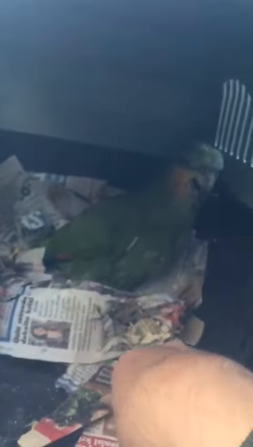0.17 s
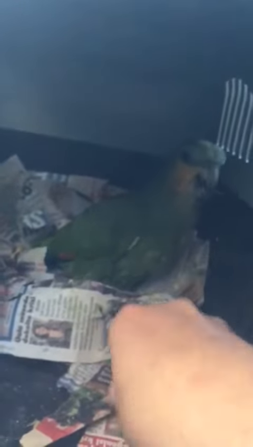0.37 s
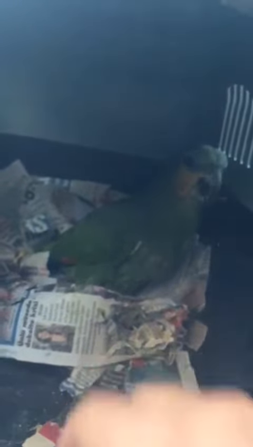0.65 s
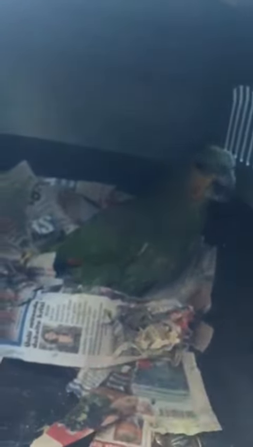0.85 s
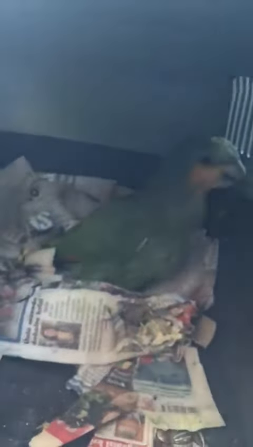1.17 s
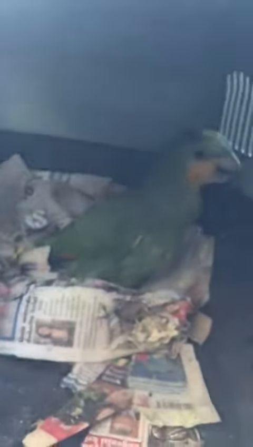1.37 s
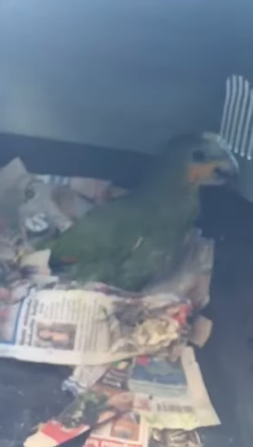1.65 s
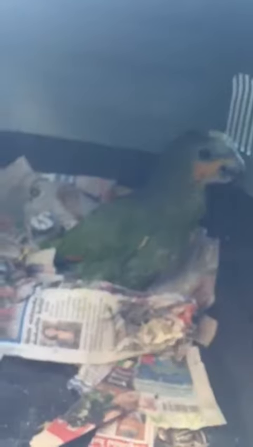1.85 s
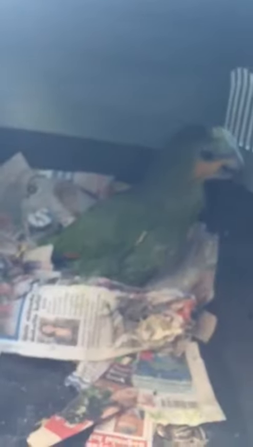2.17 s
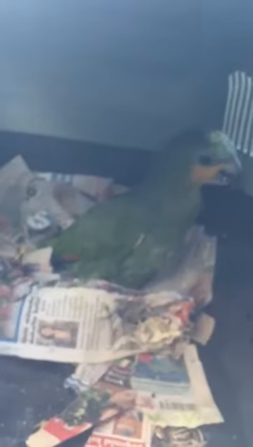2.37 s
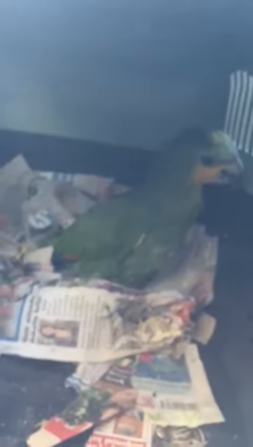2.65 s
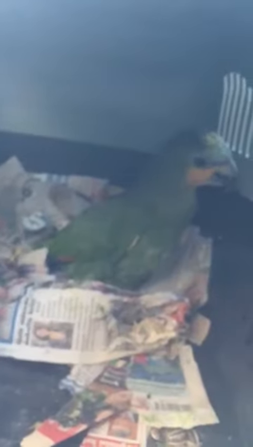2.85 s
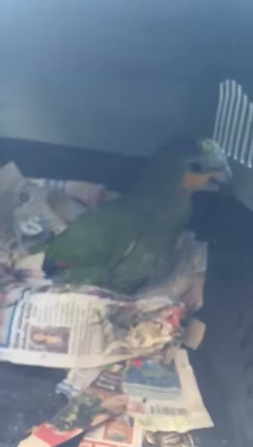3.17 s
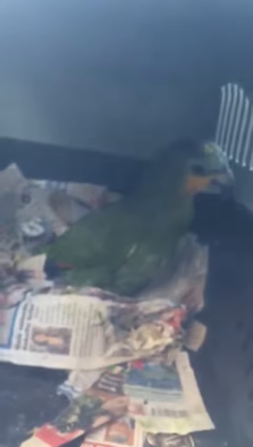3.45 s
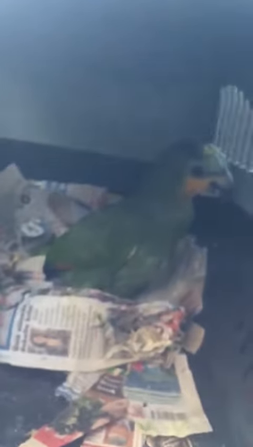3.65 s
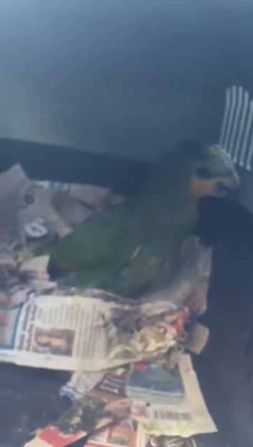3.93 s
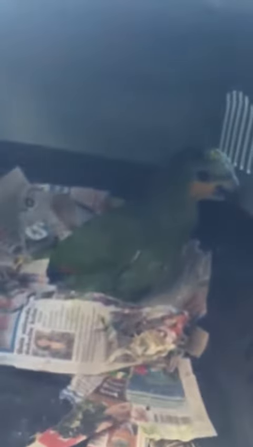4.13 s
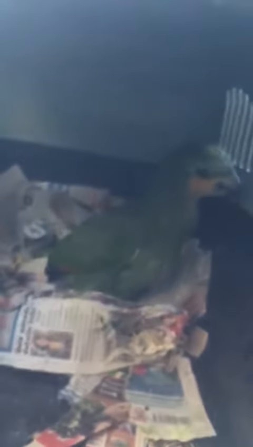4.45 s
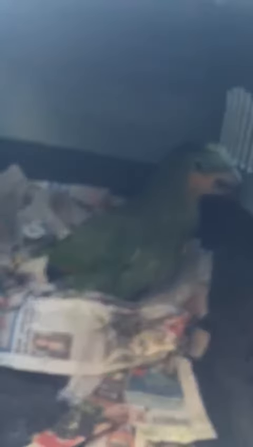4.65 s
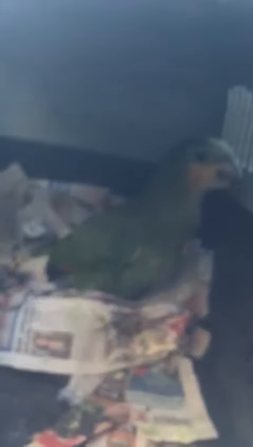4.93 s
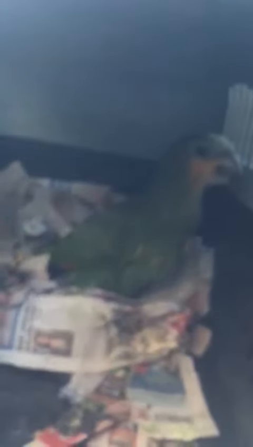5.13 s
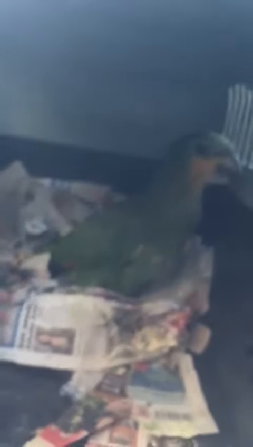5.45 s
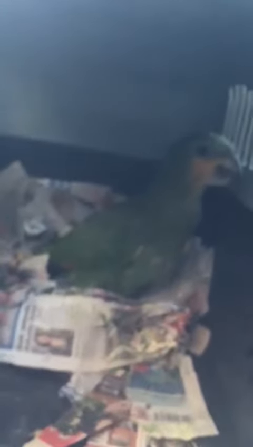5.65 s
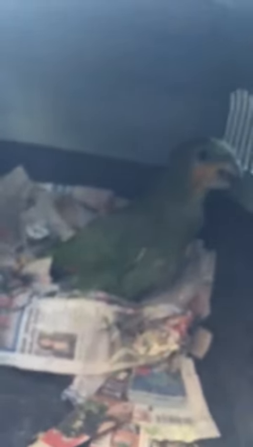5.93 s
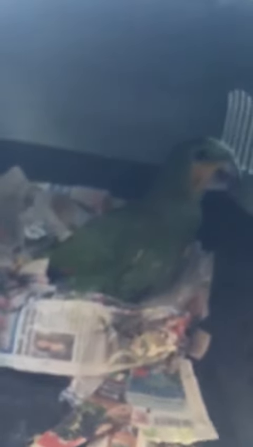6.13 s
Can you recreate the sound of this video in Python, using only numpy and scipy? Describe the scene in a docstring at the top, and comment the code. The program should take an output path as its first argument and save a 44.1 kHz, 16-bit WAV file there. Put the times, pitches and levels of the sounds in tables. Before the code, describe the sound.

A parrot cracks shells close by in a hard carrier, irregular clicks thinning to soft paper rustles above deep, wavering road drone.

```python
"""Inside a car cabin, probably moving slowly, a parrot sits on newspaper and seed shells in a plastic carrier.
Close by, shells snap under beak and feet: sharp impulses that bounce and ring briefly in the small hard box.
Paper scuffs are bursts of uneven slips through the same box; a few snaps and clicks also carry short notes.
Behind them lie shaped noise for road rumble and hiss, gliding sines for a low drone and boom,
and a faint engine hum of four partials that climbs and falls back."""
import sys
import numpy as np
from scipy import signal
from scipy.fft import rfft, irfft
from scipy.io import wavfile
from scipy.ndimage import uniform_filter1d

SR = 44100
rng = np.random.default_rng(int(sys.argv[2]) if len(sys.argv) > 2 else 0)


def wav_record(signal):
    """Record a signal, one row per channel, as 16-bit PCM in the file named by sys.argv[1]."""
    frames = np.transpose(np.atleast_2d(signal))
    bounded = np.clip(frames, -1, 1)
    # unit amplitude maps onto the largest positive 16-bit level
    quanta = np.round(bounded * 32767).astype(np.int16)
    wavfile.write(sys.argv[1], SR, quanta)


N = 277830
TIME = np.arange(N) / SR  # s
TOP_HZ = 12000  # upper limit of the phone microphone

# Resonant spectrum of the cabin, for road noise and engine: (frequency [Hz], relative level [dB])
CABIN_SPECTRUM = [(20, -49), (33, -18), (44, -10), (55, 5), (72, -2), (95, -14), (117, -15), (135, -13.5),
                  (168, -23), (212, -17.5), (236, -24.5), (280, -24.5), (350, -31.5), (600, -57),
                  (2000, -90)]


def undb(db):
    """Decibels to amplitude gain."""
    return 10 ** (np.asarray(db) / 20)


def unit(x):
    """Scale to rms 1."""
    return x / np.sqrt(np.mean(x ** 2))


def curves(table):
    """Each column after the time column, interpolated to every sample."""
    s, *columns = np.transpose(table)
    return [np.interp(TIME, s, column) for column in columns]


def colour(points, hz):
    """Gain of a (Hz, dB) spectrum at the given frequencies, interpolated on a log frequency axis."""
    f, db = np.transpose(points)
    return undb(np.interp(np.log(np.maximum(hz, 1)), np.log(f), db))


def noise(points):
    """Steady noise of rms 1 with the given spectrum."""
    hz = np.arange(N // 2 + 1) * SR / N
    spectrum = rfft(rng.standard_normal(N)) * colour(points, hz)
    return unit(irfft(spectrum, N))


def walk(rate):
    """Slow random drift, about `rate` new values a second, with a spread near 1."""
    hold = int(SR / rate)
    steps = np.repeat(rng.standard_normal(N // hold + 1), hold)
    return unit(uniform_filter1d(steps, hold)[:N])


def fade(t, t60):
    """Exponential decay, 60 dB down after t60 seconds."""
    return np.exp(-np.log(1000) * t / t60)


def add(out, s, sound):
    """Mix a sound in at time s."""
    i = max(int(s * SR), 0)
    out[i:i + len(sound)] += sound[:N - i]


def air(hiss_db=-69.5):
    """Faint even hiss of the cabin air: steady shaped noise."""
    # Hiss spectrum: (frequency [Hz], relative level [dB])
    hiss_spectrum = [(250, -8.5), (420, 0.5), (620, 1.5), (900, -3), (2000, -7), (4000, -10.5), (4900, -14),
                     (5700, -11), (8000, -15), (11700, -18.5)]
    return noise(hiss_spectrum) * undb(hiss_db)


def road(low_db=0., panels_db=0., split_hz=110, steadiness=0.51, lumps_db=3.5):
    """Tyres shake the cabin: a deep rumble, and panels that drum unevenly above it."""
    # Roughness of the road: (time [s], deep rumble level [dB], drumming panels level [dB])
    roughness = [(0, -41.5, -52.5), (.47, -57.5, -61), (.66, -43, -62), (.9, -52.5, -59), (1.4, -46, -59.5),
                 (2.4, -48, -60.5), (3.2, -55.5, -62), (3.6, -47.5, -63.5), (4, -53.5, -60.5),
                 (4.45, -51, -62.5), (5.1, -48.5, -62), (6.05, -56.5, -66), (6.17, -51.5, -58),
                 (6.3, -49.5, -70.5)]
    deep_db, drum_db = curves(roughness)
    shake = noise(CABIN_SPECTRUM)
    lowpass = signal.butter(4, split_hz, fs=SR, output="sos")
    low = signal.sosfiltfilt(lowpass, shake, padtype="even")
    # partly even out the chance swells, so that the roughness sets more of the level
    swell = np.sqrt(uniform_filter1d(low ** 2, size=6000))
    deep = unit(low / swell ** steadiness) * undb(deep_db + low_db)
    drumming = unit((shake - low) * undb(lumps_db * walk(14)))
    return deep + drumming * undb(drum_db + panels_db)


def drone(drone_db=0., boom_db=0., waver_db=1.06):
    """A low drone and its octave follow the speed of the wheels and beat against a deeper boom."""
    # Drone of the wheels: (time [s], pitch [Hz], level [dB], level of its octave [dB])
    wheel_notes = [(0, 64.29, -43.5, -67), (.3, 64.13, -48, -68), (.5, 66.23, -66, -63.5),
                   (1, 67.92, -55.5, -63), (1.4, 68, -52, -63), (2.2, 68.33, -46.5, -62),
                   (2.45, 68.3, -45.5, -82), (3, 67.77, -45.5, -75), (3.3, 66.94, -54, -74),
                   (3.7, 66.7, -46, -58.5), (4.2, 64.77, -58.5, -68), (5.5, 61.48, -56.5, -75.5),
                   (6.3, 61.3, -64, -77)]
    # Deeper boom of the cabin: (time [s], pitch [Hz], level [dB])
    cabin_boom = [(0, 52.24, -45.5), (.9, 54, -65), (1.8, 52.28, -54), (2.5, 51.09, -47), (3.4, 52, -57.5),
                  (4.3, 54.94, -48.5), (4.8, 56.67, -52), (6.3, 54.8, -71)]
    hz, db, octave_db = curves(wheel_notes)
    deep_hz, deep_db = curves(cabin_boom)
    notes = [(hz, db + drone_db), (2 * hz, octave_db + drone_db), (deep_hz, deep_db + boom_db)]
    out = np.zeros(N)
    for pitch, level_db in notes:
        cycles = np.cumsum(pitch) / SR + rng.random()
        out += unit(np.sin(2 * np.pi * cycles)) * undb(level_db + waver_db * walk(3))
    return out


def engine(engine_db=-2.0, waver_db=1.5):
    """Engine partials swell as they glide through the cabin's resonances, relative to the firing note."""
    # Engine: (time [s], firing rate [Hz], level before the engine_db trim [dB])
    firing = [(0, 85.68, -62), (1.1, 81, -60.5), (1.7, 82.52, -52.5), (2.3, 85, -50.5), (3, 88, -52),
              (3.6, 91, -55), (4.35, 94.34, -50), (4.65, 89.7, -63.5), (6.3, 79.6, -74.5)]
    # Partials before the cabin colours them: (multiple of the firing rate [ratio], relative level [dB])
    partials = [(1, 0), (2, -8), (7 / 3, -5), (3, -10)]
    hz, db = curves(firing)
    phase = 2 * np.pi * np.cumsum(hz) / SR
    hum = np.zeros(N)
    for multiple, part_db in partials:
        strength = undb(part_db + waver_db * walk(7.0)) * colour(CABIN_SPECTRUM, multiple * hz)
        hum += strength * np.sin(multiple * phase + 2 * np.pi * rng.random())
    # dividing by the cabin's gain at the firing rate leaves the level to the table
    return unit(hum / colour(CABIN_SPECTRUM, hz)) * undb(db + engine_db)


def causal(gain):
    """Minimum-phase response with this gain: nothing sounds before the blow."""
    cepstrum = irfft(np.log(gain + 1e-12))
    half = len(cepstrum) // 2
    cepstrum[1:half] *= 2
    cepstrum[half + 1:] = 0
    return np.exp(rfft(cepstrum))


def contact(db, hz, q, thump_db, thump_hz=1170, fall_db_per_octave=9.5):
    """Band levels of one contact: the resonance of the shell or paper, plus a dull thump of the box."""
    # Centres of the six contact bands: (frequency [Hz])
    centres = np.array([1200, 2000, 3050, 4400, 6250, 9500])
    ring = 1 / (1 + (q * (centres / hz - hz / centres)) ** 2)
    # the thump has its set level at thump_hz and falls towards the treble
    thump = undb(thump_db - fall_db_per_octave * np.log2(centres / thump_hz))
    return 10 * np.log10(undb(db) ** 2 * ring / ring.sum() + thump ** 2)


def voiced(x, band_db, seconds):
    """Give a contact the colour of the box and its own strength in each band."""
    # Colour of any contact inside the box: (frequency [Hz], relative level [dB])
    box_colour = [(150, -35.5), (380, -26), (560, -6), (700, -11), (820, -1), (1300, 7), (1650, 5.5),
                  (2050, 10), (4500, 4), (5100, -2), (5600, 2.5), (6500, 2.5), (7700, -4), (11800, -5.5)]
    # Borders between the contact bands: (frequency [Hz])
    edges = [1600, 2500, 3700, 5200, 7500]
    hz = np.fft.rfftfreq(len(x), 1 / SR)
    spectrum = rfft(x) * causal(colour(box_colour, hz))
    band = np.searchsorted(edges, hz)
    energy = np.bincount(band, np.abs(spectrum) ** 2 * (hz < TOP_HZ)) * 2 / len(x)
    power = energy / (seconds * SR)
    gain_db = np.asarray(band_db) - 10 * np.log10(power)
    smooth_db = uniform_filter1d(gain_db[band], size=61)  # soft steps between bands
    return irfft(spectrum * causal(undb(smooth_db)))


def carrier(t, scatter_db=-24, cabin_db=-49, modes_db=-39, build_s=.0007,
            direct_db=-4.5, shell_hz=5900, shell_t60=0.00078):
    """Response to one contact: direct tick, wall bounces, dense scatter and the ringing box."""
    # First bounces off the walls: (mean delay [ms], gain [ratio])
    bounces = [(1.419, -0.43), (2.198, 0.02), (3.303, 0.48), (4.601, -0.2)]
    # Ringing of the plastic box and its air: (mean pitch [Hz], level relative to modes_db [dB], t60 [s])
    box_modes = [(861, -5, 0.065), (1240.6, -20, 0.044), (1382, -4.5, 0.064), (1962, 1, 0.046),
                 (2890, 3, 0.043), (3933, -9.5, 0.016), (4680, 6, 0.032), (5490, 4, 0.045),
                 (6030, -3, 0.044), (6400, 0, 0.04), (6484, 3, 0.054), (7780, -3.5, 0.065)]
    # dense reflections: short ones in the box, longer and fainter ones in the cabin
    scatter = undb(scatter_db) * fade(t, .04) + undb(cabin_db) * fade(t, .1)
    tail = rng.standard_normal(len(t)) * scatter
    variations = rng.uniform(-1, 1, (len(box_modes), 2))
    for (hz, db, t60), (detune, phase) in zip(box_modes, variations):
        mode_hz = hz * (1 + 0.0045 * detune)
        tail += undb(modes_db + db) * fade(t, t60) * np.sin(2 * np.pi * mode_hz * t + np.pi * phase)
    response = tail * (1 - np.exp(-(t / build_s) ** 2))
    # a small shell rings for a few cycles and radiates little bass: the lows come later, from the walls
    response += undb(direct_db) * fade(t, shell_t60) * np.sin(2 * np.pi * shell_hz * t + np.pi / 4)
    # the bird is never in quite the same spot, so the bounces shift
    for (ms, gain), shift in zip(bounces, rng.standard_normal(len(bounces))):
        delay_ms = abs(ms * (1 + .05 * shift))
        response[int(delay_ms * SR / 1000)] += gain
    return response


def box_notes(rise_s=0.0015, size=8192):
    """A few snaps and clicks also carry short decaying notes of the box, from low thuds to bright rings."""
    # Notes of the box: (time [s], pitch [Hz], level before rise and decay [dB], t60 [s])
    short_notes = [(0.8228, 2021, -18, 0.018), (.8215, 870, -41, .025), (.9512, 295, -35, 0.053),
                   (.9512, 955, -37, 0.03), (.9512, 2750, -21, 0.01391), (1.6545, 840, -43, 0.046),
                   (1.6569, 1140, -45.5, 0.069), (2.0965, 880, -42, .024)]
    out, t = np.zeros(N), np.arange(size) / SR
    for s, hz, db, t60 in short_notes:
        envelope = fade(t, t60) * (1 - np.exp(-t / rise_s))
        add(out, s, undb(db) * np.sin(2 * np.pi * hz * t) * envelope)
    return out


def scuffs(scuff_db=0., jitter=0.35, grit_db=-30, slips_per_s=380, slip_spread_db=3, size=12288):
    """A slide swells and fades as it sticks and slips: uneven jerks with grit between, each ringing the box."""
    # Claws, beak and feathers sliding on paper and plastic: (time [s], length [s], level [dB],
    # pitch [Hz], sharpness of that pitch [Q], thump of the box [dB])
    slides = [(0, 0.031, -61.5, 5730, 1.1, -74), (.034, .013, -50.5, 2560, 9, -54),
              (0.275, .09, -74, 10900, 5.4, -91), (0.847, 0.026, -63, 5700, 1.9, -63.5),
              (1.646, 0.01, -57.5, 7570, 2, -53), (3.987, 0.041, -64, 6900, 6.7, -85.5),
              (4.095, 0.023, -68, 5800, 6, -90), (4.468, 0.092, -69, 5616, 2.9, -88),
              (4.637, 0.12, -75, 4600, 1.3, -76), (4.907, 0.022, -69, 7040, 0.44, -92.5),
              (5.647, 0.021, -58, 1700, 1.6, -66.5), (5.788, 0.046, -58, 1330, 1.7, -67.5),
              (5.889, 0.013, -61.5, 1150, 2.1, -69), (5.903, 0.021, -56.5, 1550, 1.6, -71.5)]
    out, t = np.zeros(N), np.arange(size) / SR
    for s, length, *touch in slides:
        gaps, strength = rng.standard_normal(size=(2, 256))
        when = np.cumsum(np.exp(jitter * gaps) / slips_per_s) - .5 / slips_per_s
        inside = when < length
        slips = undb(grit_db) * rng.standard_normal(size)
        slips[(when[inside] * SR).astype(int)] += undb(slip_spread_db * strength[inside])
        pressure = np.sqrt(np.maximum(t * (length - t), 0))  # a half-ellipse over the slide
        slide = signal.fftconvolve(slips * pressure, carrier(t))[:size]
        add(out, s, voiced(slide, contact(*touch), length))
    return undb(scuff_db) * out


def snaps(snap_db=-2.09, size=8192):
    """Shell snaps and beak clicks: each is one sharp impulse into the box."""
    # Snaps and clicks: (time [s], shell level before the snap_db trim [dB], shell pitch [Hz],
    # sharpness of that pitch [Q], thump of the box before the same trim [dB])
    clicks = [(.1339, -50, 6900, 1.1, -69), (.149, -56.5, 4500, 1.2, -60), (.1627, -36, 4100, 4.7, -47),
              (0.2665, -58.5, 10500, 7, -80), (0.2672, -53.5, 4360, 7.5, -62),
              (.6389, -47, 6900, 12, -56.5), (.6648, -44, 5620, 6.7, -49), (.8202, -18, 5750, 9.2, -31),
              (0.9504, -18, 5630, 4.2, -28), (.9608, -48.5, 8700, 5.5, -52.5),
              (1.1053, -48, 4900, 1.2, -54.5), (1.2242, -46, 5500, 1, -50.5),
              (1.2809, -58.5, 3340, 0.63, -71), (1.292, -45.5, 3620, .8, -81),
              (1.438, -60.5, 11000, 3.3, -89), (1.6598, -54.5, 9400, 3.8, -51),
              (2.0957, -26.5, 6300, 0.62, -33), (2.1362, -50.5, 6500, 1.3, -64.5),
              (2.148, -38, 5900, 7.4, -43), (2.1548, -28, 6200, 4, -68), (2.2825, -51, 6000, 1, -83.5),
              (2.509, -64.5, 9000, 2.5, -82), (2.9337, -43.5, 2294, 3.2, -72.5),
              (2.9371, -37, 3400, 1.8, -84.5), (3.713, -78, 3040, 1, -68.5),
              (4.2586, -59.5, 5700, 6.9, -66.5), (4.298, -53, 7740, 9.7, -78), (4.3487, -44, 7250, 6, -74),
              (4.3569, -34, 5930, 4.2, -52.5), (4.3697, -40.5, 6400, 5.2, -69),
              (4.385, -49.5, 5700, 4.7, -57), (4.4007, -43, 6100, 3.66, -47.5),
              (4.4119, -25.5, 6200, 3.6, -44.5), (4.5193, -62, 5700, 4, -87),
              (4.5408, -53.5, 6500, 5.1, -89), (4.6339, -62.5, 5000, 1.1, -66.5),
              (4.7383, -41, 5660, 5.5, -56.5)]
    out, t = np.zeros(N), np.arange(size) / SR
    for s, *touch in clicks:
        add(out, s, voiced(carrier(t), contact(*touch), seconds=1 / 100))
    return undb(snap_db) * out


def scene():
    """The bird in its box, close by, over the sound of the cabin."""
    cabin = air() + road() + drone() + engine()
    bird = box_notes() + scuffs() + snaps()
    return (cabin + bird)[None]


def record(dry):
    """The phone microphone: a steep low-pass cuts the top."""
    lowpass = signal.ellip(10, .2, 60, TOP_HZ, fs=SR, output="sos")
    return signal.sosfilt(lowpass, dry)


dry = scene()
out = record(dry)
wav_record(out)
```